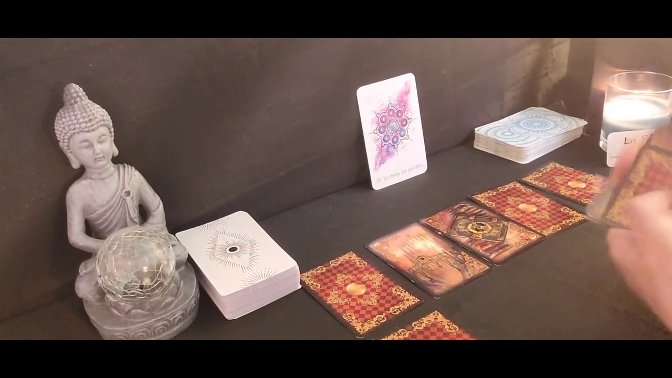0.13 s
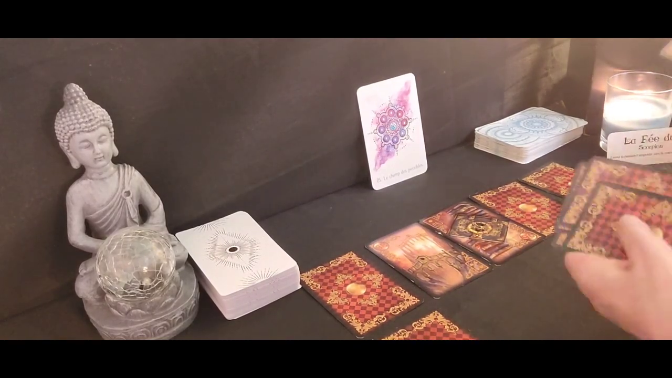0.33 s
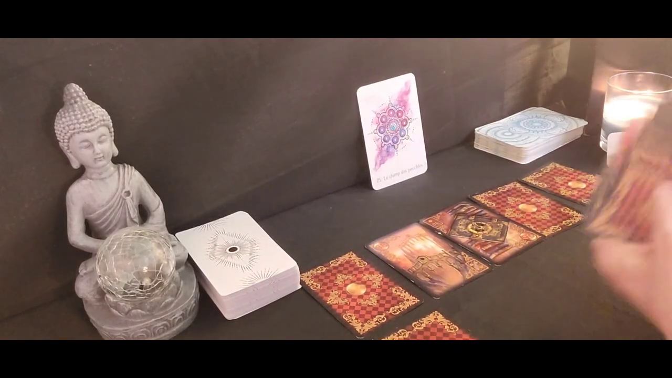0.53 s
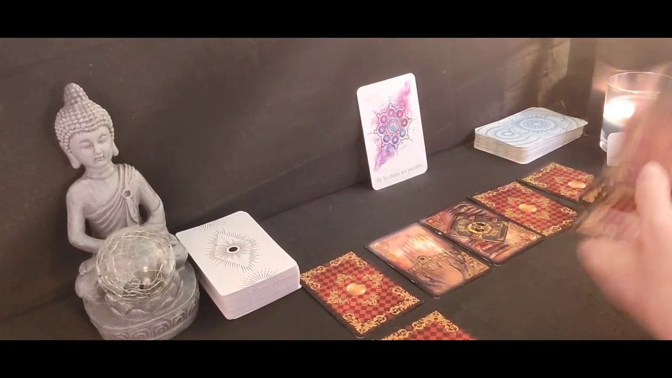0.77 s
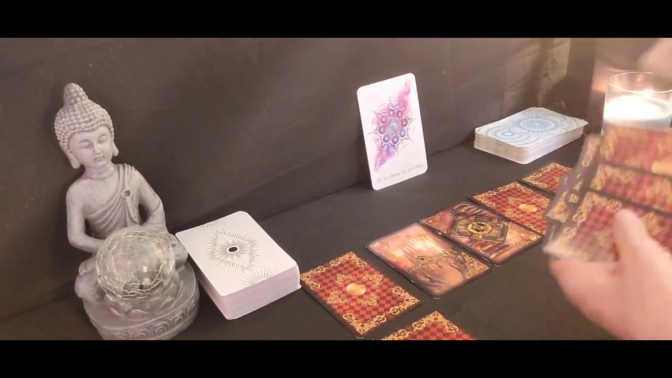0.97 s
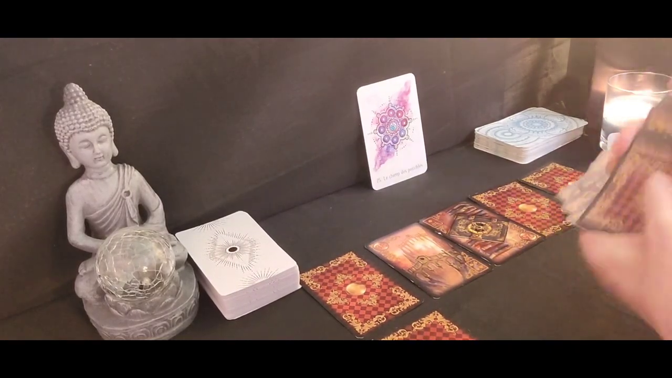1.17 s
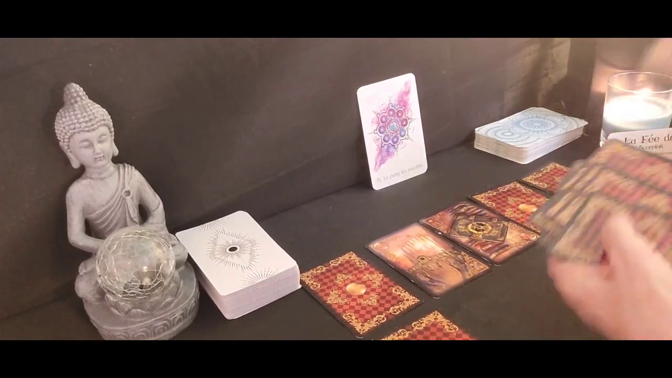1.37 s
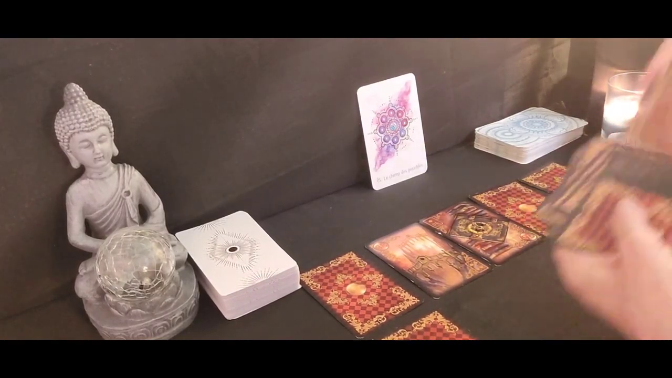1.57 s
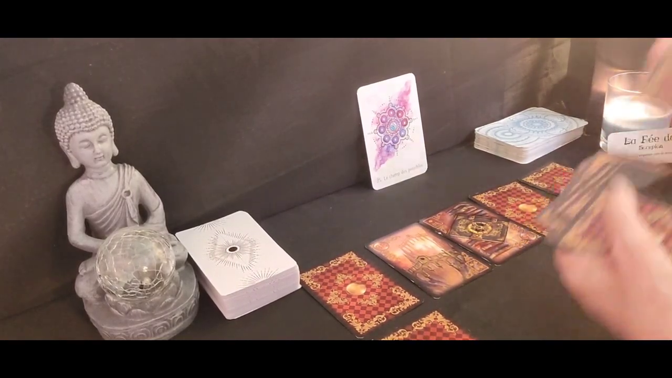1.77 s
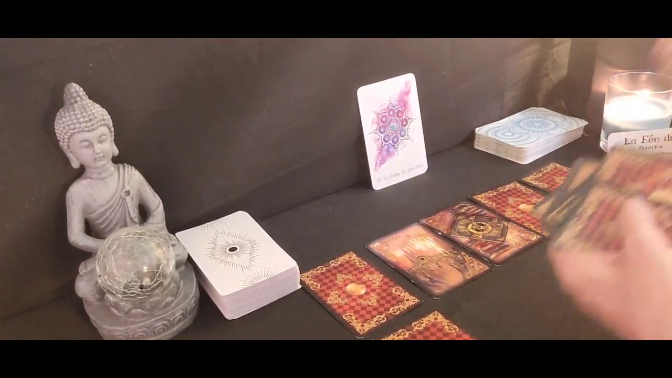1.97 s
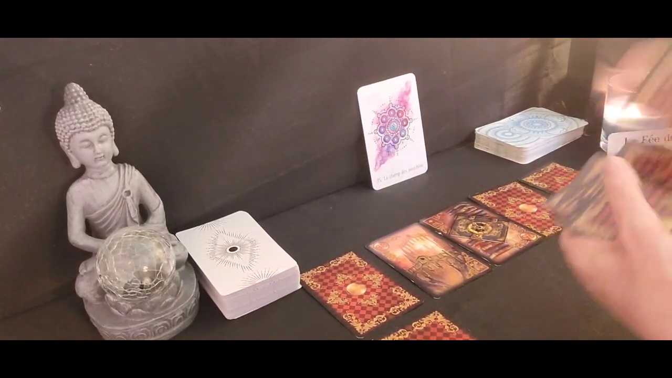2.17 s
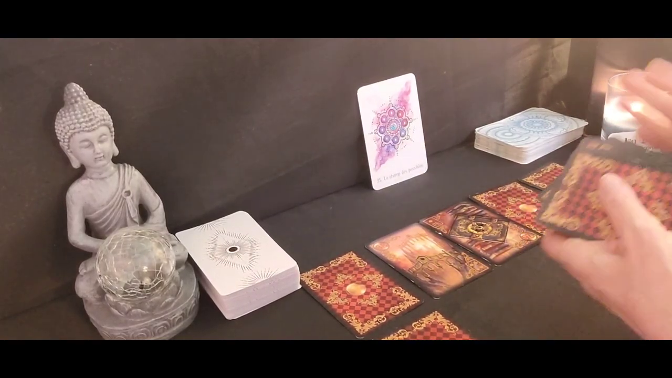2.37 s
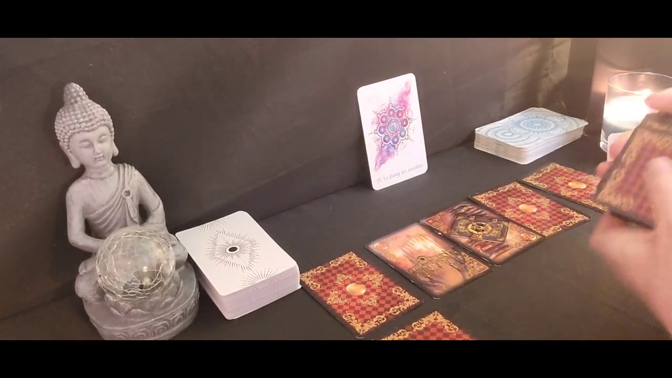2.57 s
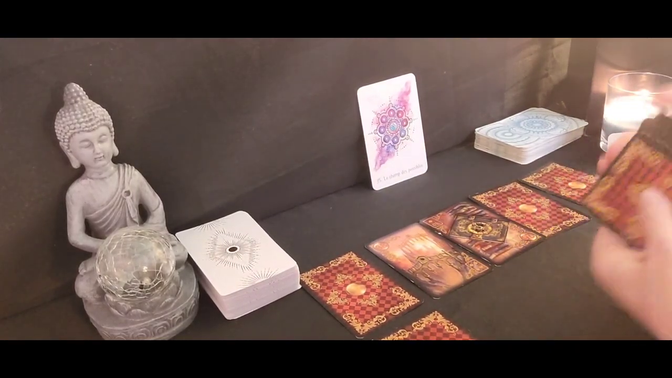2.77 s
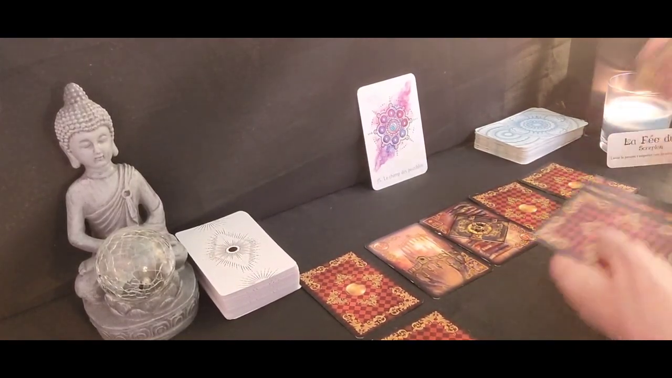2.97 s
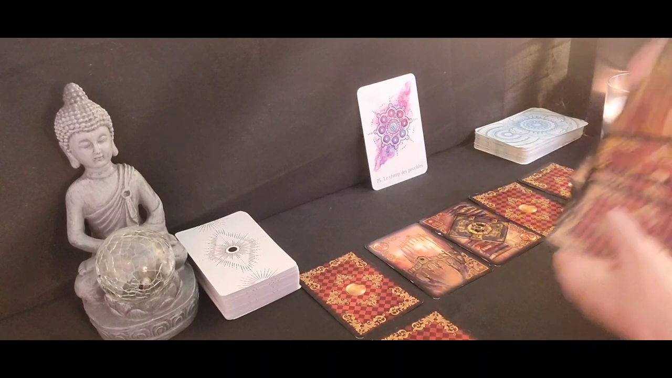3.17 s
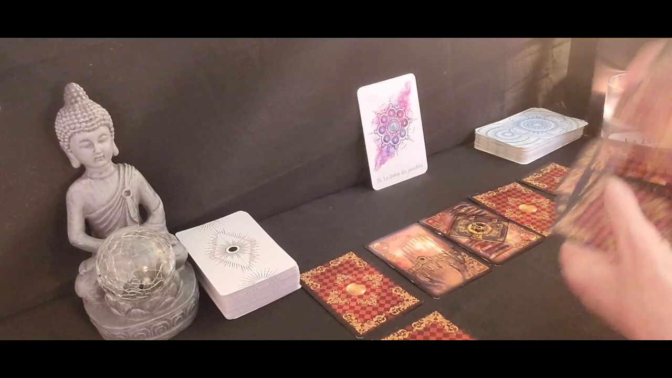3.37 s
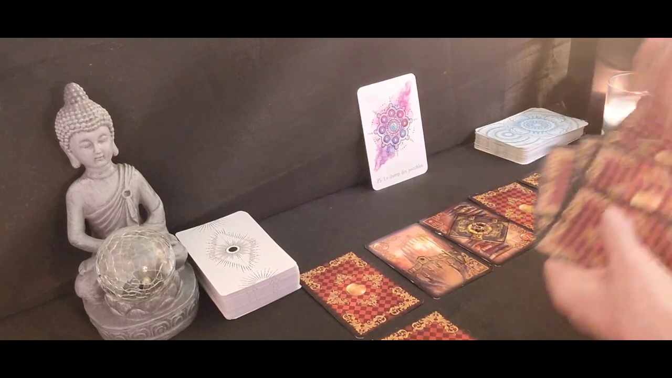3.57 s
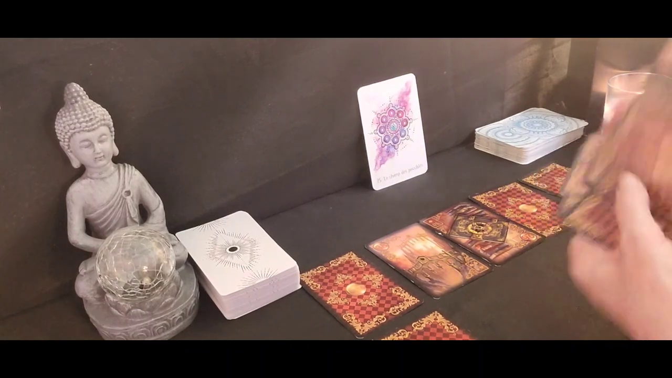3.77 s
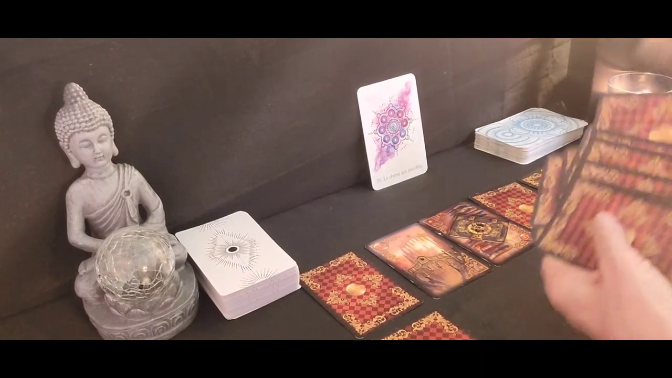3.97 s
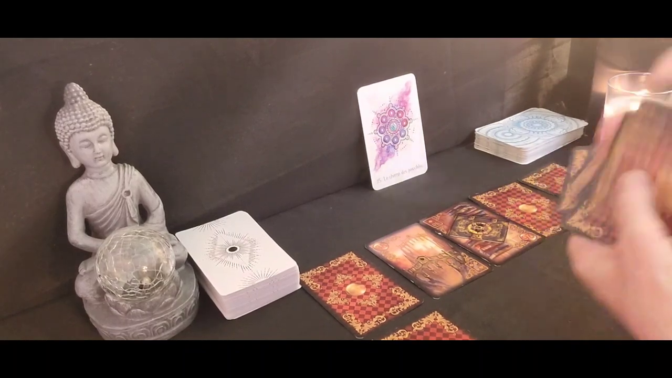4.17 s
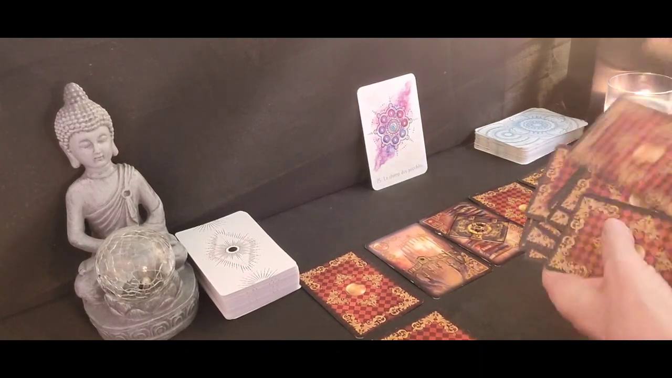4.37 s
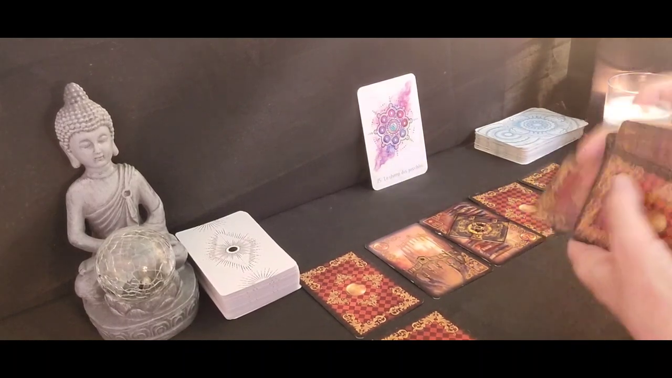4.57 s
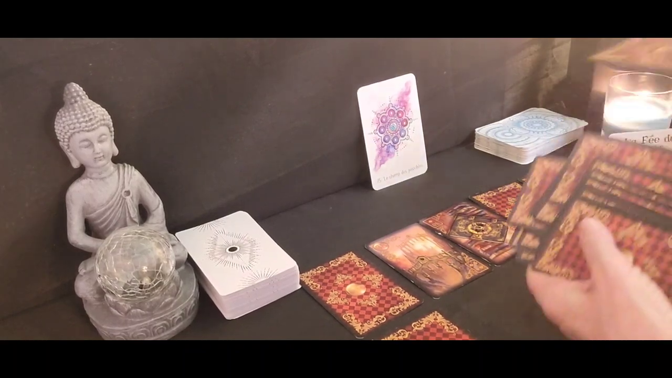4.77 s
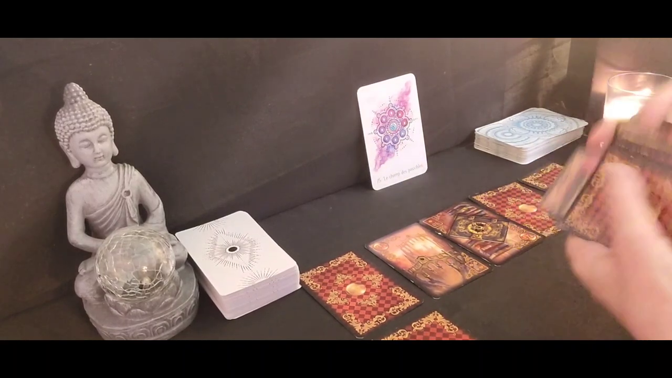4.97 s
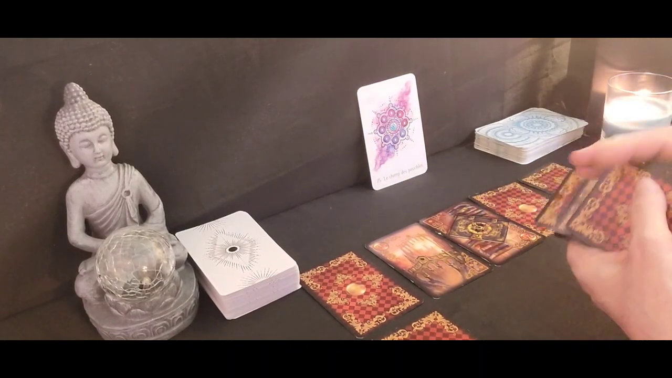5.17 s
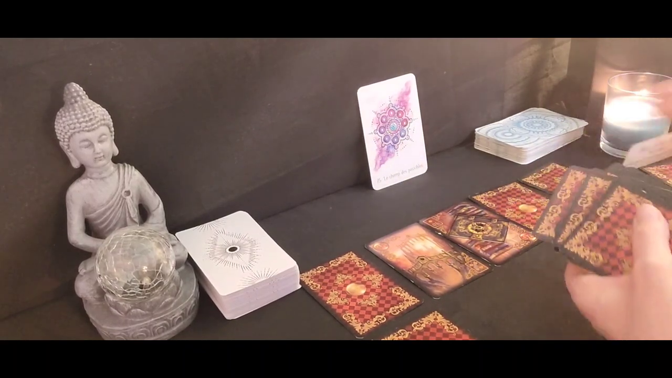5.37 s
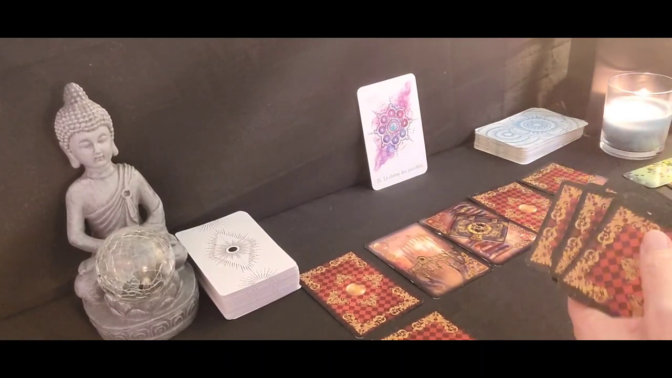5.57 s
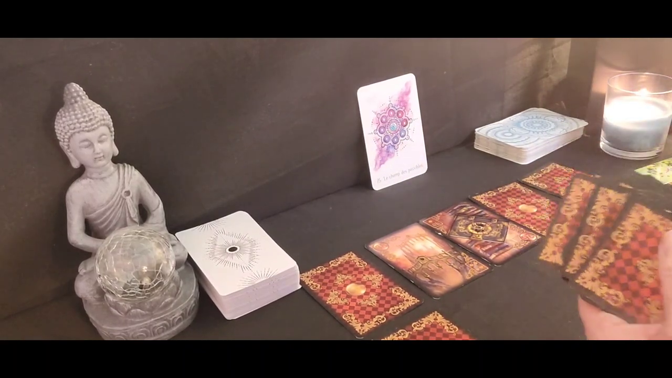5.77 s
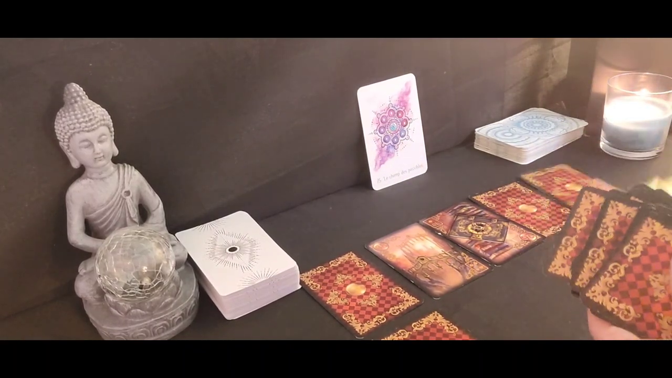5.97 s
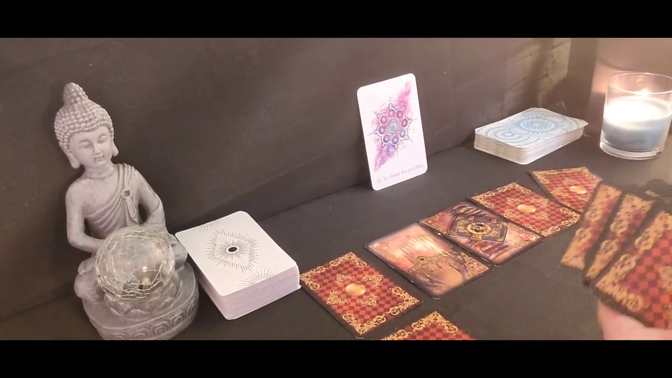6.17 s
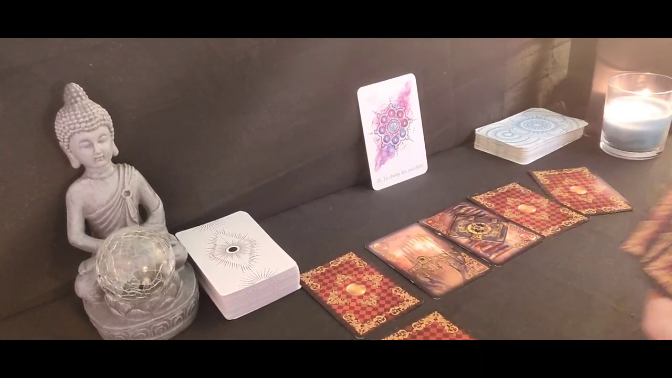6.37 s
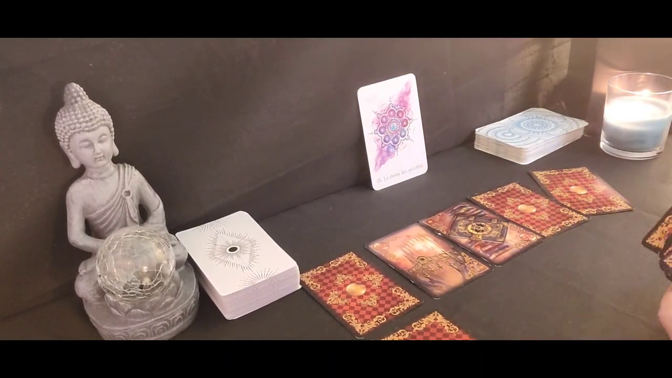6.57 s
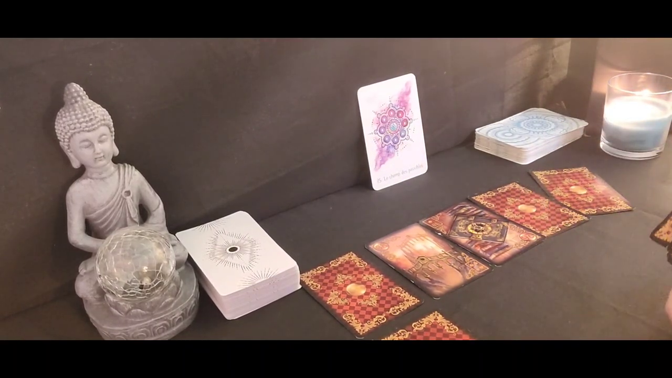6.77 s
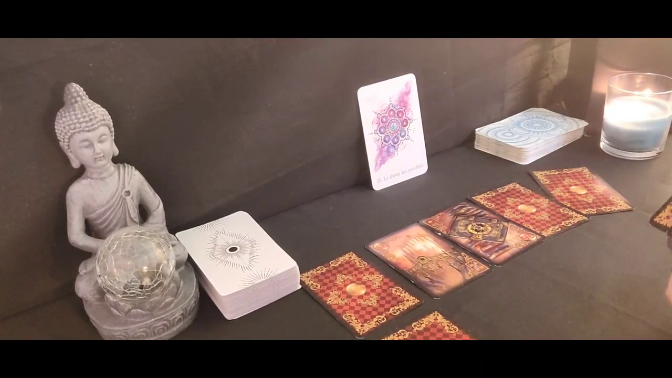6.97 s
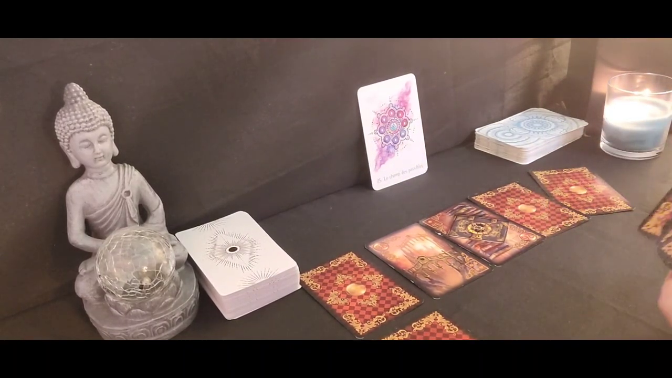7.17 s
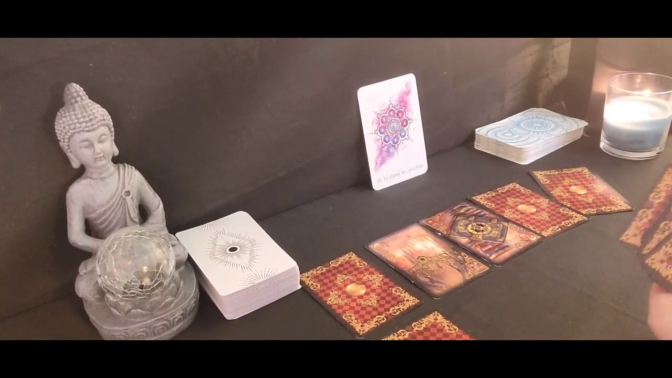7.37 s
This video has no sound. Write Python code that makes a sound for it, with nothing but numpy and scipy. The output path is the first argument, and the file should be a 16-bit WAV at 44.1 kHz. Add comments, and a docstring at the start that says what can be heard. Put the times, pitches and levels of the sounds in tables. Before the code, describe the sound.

Stiff cards clack and swish in an overhand shuffle, pause briefly, then a card is slid along the tabletop and lightly tapped.

```python
"""A deck of stiff cards shuffled overhand just above a table, then one card slid along the top.
Each packet knocks edge-first into the deck and slides home with a grainy hiss; now and then a card is
whipped free. The table top rings when the deck taps it and hums low under the hands.
Small quiet room; two microphone ports a few centimetres apart, with the hands off to the left."""
import sys
import numpy as np
from scipy import signal
from scipy.fft import rfft, irfft, next_fast_len
from scipy.io import wavfile

SR = 44100
rng = np.random.default_rng(int(sys.argv[2]) if len(sys.argv) > 2 else 0)


def wav_out(sig):
    """Save sig, one row per channel (or a flat mono array), as 16-bit PCM at SR to the path in sys.argv[1]."""
    wavfile.write(sys.argv[1], SR, np.round(np.clip(np.atleast_2d(sig).T, -1, 1) * 32767).astype(np.int16))


N = 326776

# edges knock: t/s, rattle/dB, packet flex f/Hz, flex/dB re rattle, body/dB re rattle, left over right/dB
EDGE_KNOCKS = [(.1654, -32.5, 1950, -3.5, -9, 3.5), (0.1777, -41.5, 1750, 4.5, -2, 4),
               (0.2196, -42, 1620, -3, -6, 5), (.3044, -41, 1330, -3.5, 5, 0),
               (0.4188, -63, 1600, -6, -5.5, 2), (0.4909, -52, 1530, 1, -1, -6),
               (0.504, -37, 1690, -30, -29, 10), (.628, -35.5, 1785, -2, -4.5, 7),
               (.659, -57.5, 1308, -6, 9.5, 2.5), (.743, -61.5, 2520, -14, -13, 2),
               (0.801, -56.5, 2560, -25, -22.5, 2), (.8338, -42, 1670, -13, 2, 24.5),
               (0.835, -45.5, 1640, 19.5, -15, 5), (0.8373, -30.5, 998, -6, -10, 5),
               (.8564, -32.5, 1410, 10.5, -7, -2), (.9503, -46.5, 2580, -12, 3, 1),
               (1.0135, -48.5, 1840, -4.5, 5.5, -1), (1.1697, -59.5, 1520, 11, -5, .6),
               (1.259, -31.5, 1630, 5.5, -2.5, 2), (1.387, -62, 1320, -8, -5.5, 5),
               (1.503, -38.5, 1280, 2, -2.5, 7), (1.509, -33.5, 1360, -3.5, -7.5, -2),
               (1.5702, -46, 1600, 9, -7.5, 4), (1.733, -66, 2520, -25, -18, 5),
               (1.8796, -33, 1804, 6.5, -20, 2), (1.8981, -47.5, 1680, 23.5, -7.5, 1),
               (1.97, -26, 2370, -10, -4, 0.5), (2.1266, -68.5, 2000, 0, -2.5, 5.5),
               (2.249, -38.5, 2200, -25, -8.5, 13), (2.498, -70, 1840, -7, -3.5, 0.5),
               (2.7349, -63, 1870, -0.5, -18.5, 3.5), (2.9239, -57, 1410, 15.5, 10, 10.5),
               (3.03, -78.5, 1390, 16.5, -8, 5), (3.0938, -42.5, 2020, 3, -3, 4),
               (3.1241, -38.5, 1310, 6.5, -13, 3.5), (3.183, -45.5, 1250, -1, 6, 1),
               (3.2316, -44.5, 2590, 3.7, -7, -2), (3.4446, -55.5, 2450, -5, -4.5, 1),
               (3.461, -35.5, 1360, 0, -11.5, 0), (3.4894, -49.5, 2180, 20, 2, -0.5),
               (3.5491, -51, 2030, 7, 10, 0), (3.6137, -36.5, 2760, -7.5, -4, 2),
               (3.7948, -62, 1950, 3, -5, -.6), (3.8114, -42.5, 1300, 2, 5, 5),
               (3.8207, -42.5, 1570, 5, 1, 2), (3.898, -52, 1960, 11.5, -3, -1),
               (3.964, -40, 2350, 7, -3, 0), (4.033, -68, 2370, 6, 15.5, -0.5),
               (4.1615, -58.5, 1890, -1, -3, 2), (4.1894, -49.5, 1650, -8, -11, 0),
               (4.3288, -36.5, 1730, -1, 1.5, 1), (4.4187, -61, 2020, -27, -24, 1.5),
               (4.462, -54.5, 1480, -6, -26, 3), (4.5123, -63.5, 1470, -14, -27, 2),
               (4.5623, -53.5, 1700, 18.5, 9, 5), (4.5717, -24.5, 1960, -8.5, -19, -2),
               (4.6014, -40.5, 1900, 3, -13.5, -10), (4.7494, -40, 2440, -28, -8.5, -1),
               (4.9496, -54, 1310, 2, 11, 2), (4.9927, -47, 1250, 4.5, -3.5, 5),
               (5.016, -51.5, 1250, 13.5, 10, 17), (5.0987, -40, 2100, -2.5, -5.5, 2.5),
               (5.1644, -50.5, 1220, 10.5, 6.5, 5), (5.2557, -48.5, 1620, -2, -22, 4),
               (5.8965, -77.5, 1160, -13, -14, 2.5), (6.904, -54, 2490, -26, -8.5, 15),
               (7.038, -41, 2330, -7.5, -1.5, 6)]
# a packet lands: t/s, hiss/dB, packet flex/dB re hiss, deck body/dB re hiss, table board/dB, drum/dB
PACKET_LANDINGS = [(.159, -54.5, 1.5, 6, -75, -68), (0.1657, -33.5, 2.5, -10.5, -39, -52.5),
                   (.49, -51, -12, -3, -62, -72), (0.505, -27, 3.5, -7.5, -37, -48),
                   (0.8325, -36.5, 6, 2, -54, -63), (.838, -30.5, 5, -2.5, -43.5, -59),
                   (0.859, -35, -0.5, -19.5, -43, -60), (1.163, -46, -0.5, -4, -62.5, -73.5),
                   (1.173, -37, 2.5, -4.5, -43.5, -62), (1.498, -54, 9, 8.5, -50, -58),
                   (1.51, -38, -1, -10, -45, -55), (1.873, -47.5, 5, -4, -55.5, -65),
                   (1.878, -39, 7, -0.5, -40.5, -53), (1.898, -39.5, 4.5, -7, -41, -56.5),
                   (1.971, -52.5, 15.5, -12, -45, -51), (2.249, -32.5, 1.8, -7, -40, -53.5),
                   (2.495, -78, -6, -7, -96, -93.5), (3.093, -45.5, 3.5, -0.5, -51.5, -60),
                   (3.123, -41.5, 5, 1.8, -50, -64.5), (3.442, -58, -8, -16, -76, -63),
                   (3.463, -42.5, 8.5, -2.5, -44, -50.5), (3.793, -61, -10, -10, -62, -65),
                   (3.811, -40, 0, 1, -55, -55), (3.821, -34, 1.5, -5, -44, -45.5),
                   (4.161, -59, -10, -11, -74, -80.5), (4.564, -41, 7.5, 2, -58, -65.5),
                   (4.573, -27.5, -8, -17, -49.5, -59.5), (4.952, -55.5, 1.5, 11, -53.5, -59),
                   (5.016, -41.5, 11, 5, -58, -63), (5.897, -74.5, -17.5, -11, -90, -86.5),
                   (6.79, -64, -15, -6, -65.5, -81), (7.036, -48, -14.5, -5, -58, -61)]
# stretches of hiss: short slides and, at 5.48 s, a faint steady background hiss in the pause
# t/s, length/s, hiss/dB, change added to it by the end/dB,
# then at the end: flex/dB re hiss, body/dB re hiss, board/dB, drum/dB
HISS_STRETCHES = [(0, 0.012, -65, -3, -3, -10, -81, -81), (0.053, 0.055, -74.5, -3, -7, -13, -100, -93.5),
                  (0.271, 0.036, -39.5, -2, -9.5, -16, -48, -50), (.44, .03, -83, 6, -12, -6.5, -97, -88.5),
                  (0.571, 0.078, -44.5, 0, -6.5, -11.5, -52.5, -54.5),
                  (0.9, 0.061, -44.5, 6, -10, -12, -52, -71), (1.209, 0.069, -41, 1.5, 3, -5, -49.5, -50.5),
                  (1.606, 0.023, -31, -15, -1, -2, -54.5, -59),
                  (1.837, 0.038, -87.5, -0.5, 18.5, 17.5, -70, -79),
                  (1.944, 0.048, -43.5, -1.5, -4.5, -7.5, -49, -51.5),
                  (2.082, 0.081, -92.5, -5, 17.5, 21.5, -91.5, -91),
                  (2.231, 0.0088, -70, 10.5, -9, 3.5, -70, -63),
                  (2.284, 0.01, -42, -1.5, -7, -7, -60.5, -79.5),
                  (2.539, 0.012, -53.5, 0.5, -7.5, -11, -87.5, -100),
                  (2.584, 0.073, -63.5, -15, -9, -26, -96.5, -100),
                  (2.742, 0.0056, -62, 2.5, -2, -14, -93, -90.5),
                  (2.806, 0.05, -66.5, 12.5, -4.5, -14, -82, -95),
                  (2.882, 0.028, -54.5, 8, 0, -11, -62, -63.5), (3.102, 0.013, -44, 4, -1, -4, -53, -68),
                  (3.161, 0.084, -50.5, 4.5, -11.5, -11.5, -60.5, -65),
                  (3.28, .07, -85, -6.5, -6, 9, -94, -84), (3.354, 0.072, -70.5, -1, -20, -13, -100, -88),
                  (3.448, 0.0072, -52, 3, -4, -9, -70, -65),
                  (3.491, 0.14, -45.5, -5.5, -2.5, -8, -64.5, -58),
                  (3.714, 0.11, -68.5, -15, -20, -4, -83, -80),
                  (3.884, 0.059, -49, 7.5, -6.5, -32, -62, -78),
                  (3.969, 0.11, -49, -24.5, -2, -11, -76.5, -78.5),
                  (4.08, 0.032, -75, -2.5, -6, 2, -82, -80.5), (4.218, 0.081, -46, -12, -2.5, -7, -69, -68),
                  (4.312, 0.014, -42, 2, -8.5, -8, -55.5, -49), (4.358, 0.047, -72, -10, -9, 14, -79, -63),
                  (4.406, 0.1, -71, -3.5, -9.5, -15, -83, -86), (4.547, 0.0087, -78.5, 3, 1, 13, -71, -69),
                  (4.606, 0.095, -50, -6, 2, -8.5, -64.5, -65.5),
                  (4.74, 0.011, -42.5, -1, -10.5, -15, -56.5, -53),
                  (4.816, .11, -69.5, 0.5, -13.5, -10.5, -74, -78),
                  (4.971, 0.022, -66.5, 4.5, -7.5, 11.5, -58.5, -56.5),
                  (5.042, 0.17, -50.5, -10.5, 5.5, -1, -56.5, -66.5),
                  (5.239, 0.077, -57, 13, 2.5, -7, -63.5, -70), (5.382, .1, -97, -5, 1, 12, -86, -71.5),
                  (5.48, 0.415, -97.5, -2, 0, -5.5, -91.5, -87.5),
                  (5.613, 0.046, -97, -1.5, -8, -2, -76.5, -70.5),
                  (5.691, 0.043, -89.5, -0.5, -21, -25.5, -86, -77.5),
                  (6.022, 0.12, -52.5, -2, -8.5, -12, -89, -76),
                  (6.153, 0.088, -52, -6.5, -19, -16.5, -82, -71),
                  (6.279, 0.086, -84, 4, -11.5, -11.5, -92.5, -81),
                  (6.397, .03, -73.5, 2, -23.5, -21, -96.5, -85),
                  (6.476, 0.034, -67, -6, -7.5, 4, -79, -74.5),
                  (6.567, 0.021, -60, -1.5, -26, -6.5, -73.5, -70),
                  (6.629, 0.1, -67.5, 2, -27, -23, -91, -84.5),
                  (6.779, 0.097, -68, 13, -17.5, -9.5, -60, -63), (6.882, .05, -56, 1, -0.5, -18, -64, -80),
                  (6.961, 0.065, -60.5, -1.5, 1, -2.5, -59.5, -51),
                  (7.075, 0.1, -55.5, -25, -5, -9.5, -79, -80.5),
                  (7.3, .1, -89.5, 5.5, -6, -17, -100, -80.5)]
# a card is whipped free: t/s, length/s, level before the high-pass/dB
CARD_FLICKS = [(.61, .03, -50), (.94, .03, -47), (3.235, 0.029, -55), (4.305, 0.031, -44),
               (4.575, 0.041, -46), (4.749, 0.015, -40)]
# the deck's edge taps the table: t/s, board/dB, drum/dB re board (each before its impulse gain)
TABLE_TAPS = [(0.309, -39.5, -8), (0.627, -43.5, -34), (1.01, -54, -2.5), (1.278, -32, -14.5),
              (1.972, -35.5, -40), (2.923, -53.5, -1.5), (3.548, -41.5, -14), (3.616, -44.5, -4.5),
              (3.827, -61.5, 14), (4.334, -40, -19), (4.755, -49.5, -19), (5.033, -33, -21),
              (5.108, -46, -11), (5.172, -35, -41), (6.473, -59.5, -11), (6.796, -58, -25),
              (6.905, -44.5, -35), (7.039, -38, -17)]
# the table's hum under the hands: t/s, level/dB
HUM_CURVE = [(0.0, -70), (0.1, -96), (0.18, -58), (0.47, -91), (0.56, -49), (0.6, -71.5), (1.36, -77),
             (1.44, -92.5), (1.53, -67.5), (1.77, -84.5), (2.02, -62), (2.08, -90), (2.89, -81),
             (2.93, -75), (3.36, -75), (3.65, -69.5), (3.78, -87), (3.88, -70), (3.92, -73), (5.84, -66.5),
             (6.03, -47), (6.15, -53), (6.31, -67.5), (6.95, -66.5), (7.04, -47), (7.41, -71.5)]

# resonances: f/Hz, width/Hz, relative level/dB
PACKET_FLEX_MODES = [(1424, 460, -0.5), (1672, 470, 2), (2370, 940, 3)]
DECK_BODY_MODES = [(633.3, 83, -1.5), (722, 260, 5), (1006.6, 56, 2.5)]
LONE_CARD_FLEX_MODES = [(1180, 106, -1.5), (1535, 390, -1.5)]   # one card lying on the table
LONE_CARD_BODY_MODES = [(773, 143, 0)]
BOARD_MODES = [(277, 100, 2.5), (321.3, 41, -1), (381, 96, 0)]   # the table top's ring
LOADED_BOARD_MODES = [(333, 42.5, 1), (273, 81, -5.5), (428, 110, -8)]   # the top under the resting deck
DRUM_MODES = [(85, 100, -1.5), (122, 31, 2.5), (192, 78, -12.5)]   # the table's low thud
HUM_MODES = [(32.04, 18, -8), (49.5, 19, 0), (64.94, 30, -16)]   # its deepest tones

# noise spectra: f/Hz, relative density/dB
CARD_ON_CARD_SPECTRUM = [(1060, -32), (1800, -14), (1870, 3), (2560, -4.5), (3360, 1.5), (4570, 1),
                         (6570, -3), (7210, 3), (8930, -8.5), (11900, -5.5), (15000, -8), (16200, -20),
                         (16700, -55)]
CARD_ON_TABLE_SPECTRUM = [(1180, -40), (2000, -13.5), (2560, -13.5), (4480, -3), (6010, -6), (7300, -1),
                          (8490, -11), (15200, -13), (16200, -23.5), (16700, -58.5)]
RATTLE_SPECTRUM = [(1060, -36.5), (1800, -4.5), (2610, -1), (3120, -3), (4650, -8.5), (6100, -7.5),
                   (6940, -6), (9350, -15.5), (12800, -18.5), (15800, -17.5), (16700, -48.5)]
NOISE_FLOOR_SPECTRUM = [(15, -31), (25, -2), (92, -4.5), (182, -8.5), (297, -4.5), (459, -14), (729, -18.5),
                        (2000, -23), (2290, -35), (7370, -15.5), (8670, -25), (15400, -27), (16700, -44.5)]

# decay/(dB/s) of hiss, flex, body, board, drum
LANDING_DECAYS = [333, 354, 334, 387, 290]
STRETCH_DECAYS = [417, 359.4, 308, 345, 250]
# further climb/dB of the same five on the way to their end levels, as when a slide comes home
STRETCH_CLIMBS = [2.5, 2.5, 8, 7, 15.5]

DECK_DOWN_S, LONE_CARD_S = 4.99, (5.9, 6.76)   # the deck comes to rest; one card lies on the top
LANDING_RISE_DB_S, SWELL_RISE_DB_S = 9000, 330.5
ROOM_T60_S, ROOM_DB, WALL_CUT_HZ = 0.16, -13.5, 8000
RIGHT_LAG_SAMPLES, NOISE_FLOOR_DB = 8, -79.5


def edge_knocks():
    """The first edge snaps, the others land in a dying rattle; each packet flexes at its own pitch."""
    span = 8000
    snaps, rattles, flex, body = np.zeros((4, 2, N + span))
    t = np.arange(span) / SR
    for start, rattle_db, flex_hz, flex_db, body_db, pan_db in EDGE_KNOCKS:
        edges = rng.standard_normal(span) + 0.81 * rng.standard_normal((2, span))
        edges = edges * from_db(rattle_db) * pan(pan_db)
        rattle = edges * from_db(-60 * t / 0.064)
        snap = edges * from_db(16.5 + 0.29 * rattle_db - 60 * t / 0.003)   # harder blows snap more
        at = round(start * SR)
        snaps[:, at:at + span] += snap
        rattles[:, at:at + span] += rattle
        flex[:, at:at + span] += from_db(flex_db) * resonate(rattle + 0.47 * snap, [(flex_hz, 550, 0)])
        body[:, at:at + span] += from_db(body_db) * (rattle + 0.13 * snap)
    clicks = colour(snaps[:, :N], CARD_ON_CARD_SPECTRUM) + colour(rattles[:, :N], RATTLE_SPECTRUM)
    return clicks + flex[:, :N] + resonate(body[:, :N], DECK_BODY_MODES, widen=1.3)


def card_friction():
    """Faces rub: grainy friction hisses, flexes the packet and shakes the deck; the table picks it up."""
    hiss, flex, body, board, drum = np.hypot(landing_gains(), stretch_gains())
    t = np.arange(N) / SR
    lone = (t > LONE_CARD_S[0]) & (t < LONE_CARD_S[1])
    grip = from_db(1.1 * drift(55))   # the surfaces catch and let go
    hiss = spread_noise(alike=0.12) * grip * hiss * from_db(0.92 * drift(600))
    flex = spread_noise(alike=0.67) * grip * flex * from_db(2.5 * drift(80))
    body = spread_noise(alike=0.63) * grip * body
    board = spread_noise(alike=0.8) * board
    deck_hiss = colour(shifting_overlap(hiss * ~lone, depth_db=2.5), CARD_ON_CARD_SPECTRUM)
    hiss = deck_hiss + colour(hiss * lone, CARD_ON_TABLE_SPECTRUM)
    lone_flex = from_db(3) * resonate(flex * lone, LONE_CARD_FLEX_MODES)
    lone_body = from_db(2.5) * resonate(body * lone, LONE_CARD_BODY_MODES)
    flex = resonate(flex * ~lone, PACKET_FLEX_MODES) + lone_flex
    body = resonate(body * ~lone, DECK_BODY_MODES) + lone_body
    table = table_top(board, spread_noise(alike=0.99) * drum)
    return hiss * pan(2.4) + flex * pan(1.2) + body + table


def landing_gains():
    """A landing starts at once and dies quickly: gains of hiss, flex, body, board and drum."""
    start, hiss, flex, body, board, drum = np.transpose(PACKET_LANDINGS)
    levels = [hiss, hiss + flex, hiss + body, board, drum]
    return [swell(start, 0, db, db, LANDING_RISE_DB_S, fall) for db, fall in zip(levels, LANDING_DECAYS)]


def stretch_gains():
    """The same five gains for the slides and the pause's faint hiss; none starts before its landing."""
    start, length, hiss, change, flex, body, board, drum = np.transpose(HISS_STRETCHES)
    landings = np.append(0, np.transpose(PACKET_LANDINGS)[0])
    last_landing = landings[np.searchsorted(landings, start, side="right") - 1]
    end_hiss = hiss + change
    end_levels = [end_hiss, end_hiss + flex, end_hiss + body, board, drum]
    return [swell(start, length, db - change - climb, db, SWELL_RISE_DB_S, fall, earliest=last_landing)
            for db, climb, fall in zip(end_levels, STRETCH_CLIMBS, STRETCH_DECAYS)]


def shifting_overlap(hiss, depth_db):
    """Each band of the hiss swells and sinks on its own as the overlap of the cards changes."""
    bands, below = 0, 0
    for edge_hz in (2800, 4000, 5600, 8000, 11500):
        low = signal.sosfilt(signal.butter(2, edge_hz, fs=SR, output="sos"), hiss)
        bands = bands + (low - below) * from_db(depth_db * drift(6))
        below = low
    return bands + (hiss - below) * from_db(depth_db * drift(20))


def card_flicks():
    """A card whipped free gives a short, thin, bright hiss, louder at the left port."""
    start, length, db = np.transpose(CARD_FLICKS)
    hiss = spread_noise(alike=0.2) * swell(start, length, db, db, rise_db_s=1500, fall_db_s=699)
    return signal.sosfilt(signal.butter(4, 8800, "high", fs=SR, output="sos"), hiss) * pan(2.4)


def table_taps():
    """Soft blows from the deck's edge set the table top ringing."""
    start, board_db, drum_db = np.transpose(TABLE_TAPS)
    blows = np.zeros((2, N))
    blows[:, np.round(start * SR).astype(int)] = from_db([board_db + 23.5, board_db + drum_db + 28])
    board, drum = signal.lfilter([0.12], [1, -0.88], blows)   # contact lasts a fraction of a millisecond
    return table_top(board, drum)


def table_top(board, drum):
    """The top rings, hollower once the deck rests on it; its low thud is louder at the right port."""
    loaded = np.arange(N) / SR > DECK_DOWN_S
    ring = resonate(board * ~loaded, BOARD_MODES)
    hollow = resonate(board * loaded, LOADED_BOARD_MODES)
    return ring + hollow + resonate(drum, DRUM_MODES) * pan(-2.6)


def table_hum():
    """The table hums low under the hands, and each landing pushes it a little more."""
    start, *_, drum_db = np.transpose(PACKET_LANDINGS)
    push_db = drum_db - 13.5
    push = swell(start, 0, push_db, push_db, SWELL_RISE_DB_S, fall_db_s=148.5)
    hands = from_db(np.interp(np.arange(N) / SR, *np.transpose(HUM_CURVE)))
    return resonate(spread_noise(alike=0.92) * np.hypot(push, hands), HUM_MODES) * pan(2.4)


def room(x):
    """Near walls return the sound: eight feedback delays a side, duller on every round."""
    size = next_fast_len(N + SR)
    w = 2 * np.pi * np.arange(size // 2 + 1) / size
    pole = np.exp(-2 * np.pi * WALL_CUT_HZ / SR)
    wall = (1 - pole) / (1 - pole * np.exp(-1j * w))
    response = np.zeros((2, len(w)), complex)
    for k, lag in enumerate((rng.uniform(0.0077, 0.025, 16) * SR).astype(int)):
        loop = from_db(-60 * lag / SR / ROOM_T60_S) * wall * np.exp(-1j * w * lag)
        response[k % 2] += loop / (1 - loop) * (-1) ** (k // 2)
    return irfft(response * rfft(x, size), size)[:, :N]


def noise_floor():
    """A faint, wavering rumble and hiss behind the cards."""
    gain = from_db(NOISE_FLOOR_DB + 2.4 * drift(3))
    return gain * colour(spread_noise(alike=0.36), NOISE_FLOOR_SPECTRUM)


def from_db(db):
    """Decibels to gain."""
    return 10 ** (np.asarray(db) / 20)


def pan(left_over_right_db):
    """Gains at the left and right port."""
    return from_db([[left_over_right_db / 2], [-left_over_right_db / 2]])


def drift(rate_hz):
    """Smooth random wander of unit rms."""
    r = np.exp(-2 * np.pi * rate_hz / SR)
    wander = signal.lfilter([1], [1, -2 * r, r * r], rng.standard_normal(N + 4000))[4000:]
    return wander / np.sqrt(np.mean(wander ** 2))


def spread_noise(alike):
    """Noise from a wide source: a part common to both ports and a part of their own."""
    return np.sqrt(alike) * rng.standard_normal(N) + np.sqrt(1 - alike) * rng.standard_normal((2, N))


def swell(start, length, start_db, end_db, rise_db_s, fall_db_s, earliest=0):
    """Summed gain of events that rise, hold on a slope and die, cut steeply before the earliest time."""
    t = np.arange(0, N + 32, 32)[:, None] / SR
    progress = np.clip((t - start) / np.maximum(length, 1e-4), 0, 1)
    level_db = (start_db + (end_db - start_db) * progress
                - rise_db_s * np.maximum(start - t, 0)
                - fall_db_s * np.maximum(t - start - length, 0)
                - LANDING_RISE_DB_S * np.maximum(earliest - t, 0))
    power = from_db(2 * np.maximum(level_db, -200)).sum(axis=1)
    return np.interp(np.arange(N) / SR, t[:, 0], np.sqrt(power))


def colour(x, spectrum, size=2048):
    """Minimum-phase filter with this spectrum; white noise keeps its rms."""
    hz, level_db = np.transpose(spectrum)
    grid = np.maximum(np.arange(size // 2 + 1) * SR / size, 1)
    cepstrum = irfft(np.log(from_db(np.interp(np.log(grid), np.log(hz), level_db))))
    cepstrum[1:size // 2] *= 2
    cepstrum[size // 2 + 1:] = 0
    pulse = irfft(np.exp(rfft(cepstrum)))
    return signal.fftconvolve(x, pulse[None] / np.linalg.norm(pulse), axes=1)[:, :N]


def resonate(x, modes, widen=1):
    """Resonances in parallel, each passed twice for steep flanks; white noise keeps its rms."""
    out, power = 0, 0
    for hz, width, level_db in modes:
        r = np.exp(-np.pi * width * widen / SR)
        section = [(1 - r * r) / 2, 0, (r * r - 1) / 2, 1, -2 * r * np.cos(2 * np.pi * hz / SR), r * r]
        out = out + from_db(level_db) * signal.sosfilt([section, section], x + 1e-18)
        power += from_db(2 * level_db) * (1 - r * r) / 4
    return out / np.sqrt(power)


def scene():
    """Hands to the left of the microphone, so the right port hears them late; the room around them."""
    cards = card_friction() + table_hum() + edge_knocks() + table_taps() + card_flicks()
    reverb = from_db(ROOM_DB) * room(cards.mean(axis=0))
    cards[1] = np.concatenate([np.zeros(RIGHT_LAG_SAMPLES), cards[1, :-RIGHT_LAG_SAMPLES]])
    return cards + reverb + noise_floor()


def record(dry):
    """A steep low-pass takes off the highest treble, 60 dB down at 16.8 kHz."""
    return signal.sosfilt(signal.cheby2(14, 60, 16800, fs=SR, output="sos"), dry)


dry = scene()
out = record(dry)
wav_out(out)
```